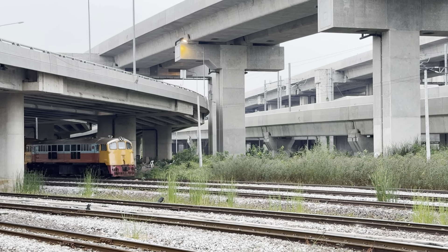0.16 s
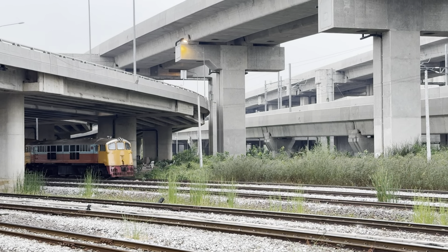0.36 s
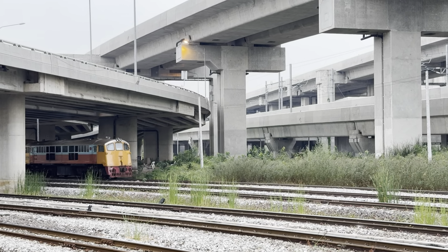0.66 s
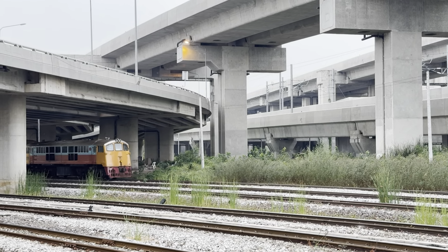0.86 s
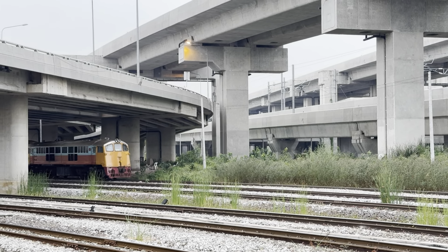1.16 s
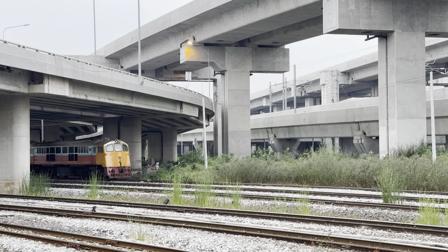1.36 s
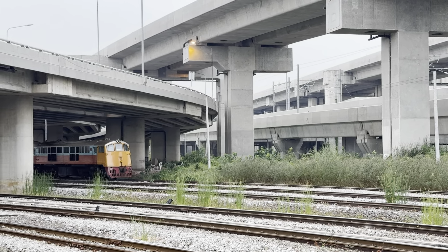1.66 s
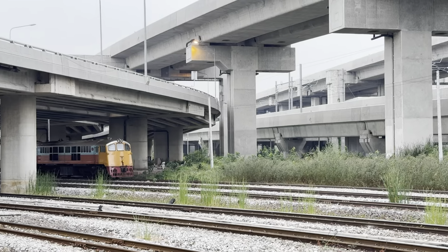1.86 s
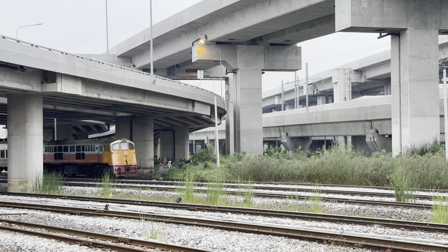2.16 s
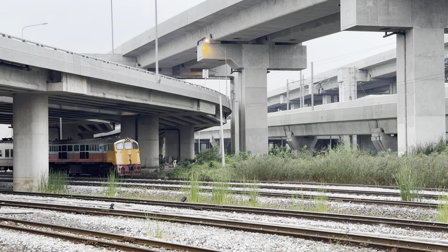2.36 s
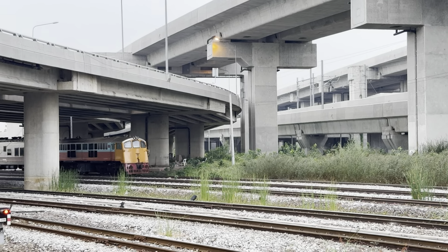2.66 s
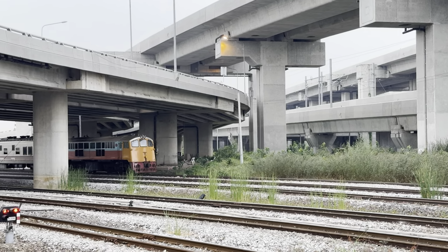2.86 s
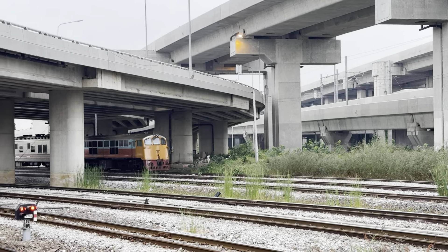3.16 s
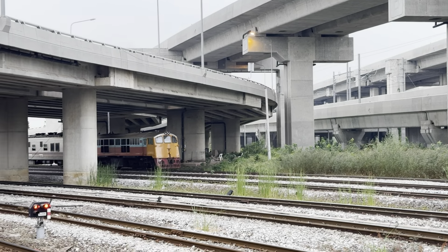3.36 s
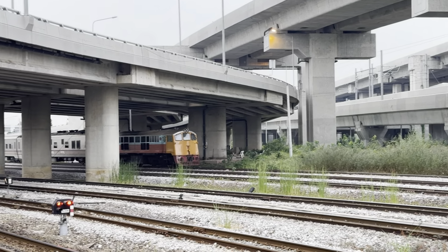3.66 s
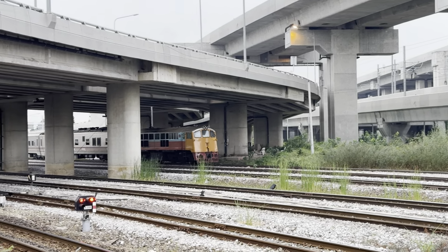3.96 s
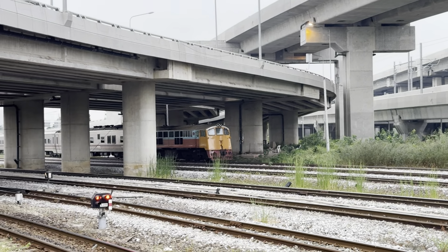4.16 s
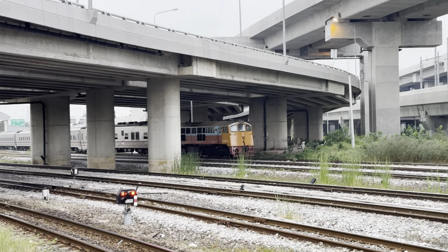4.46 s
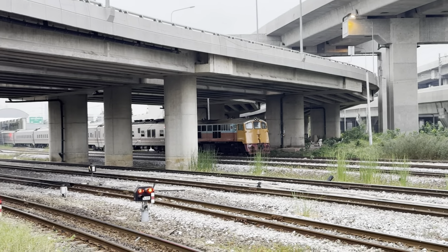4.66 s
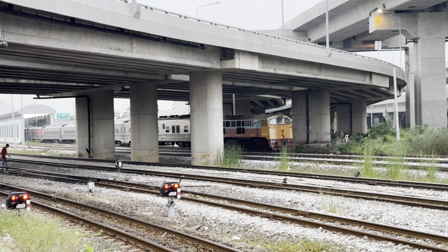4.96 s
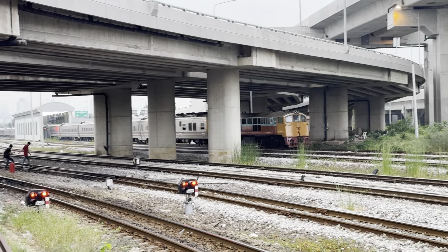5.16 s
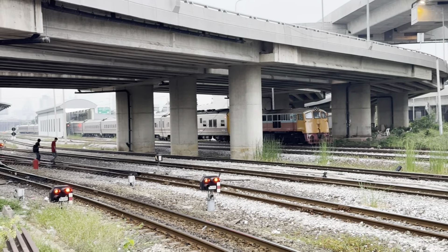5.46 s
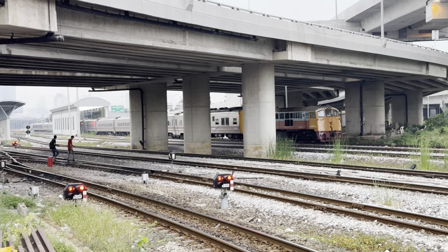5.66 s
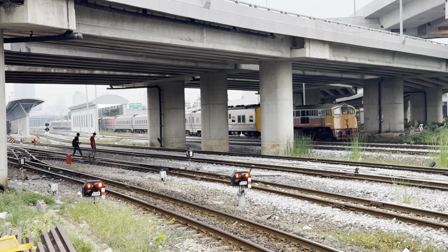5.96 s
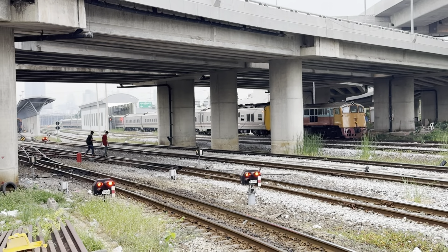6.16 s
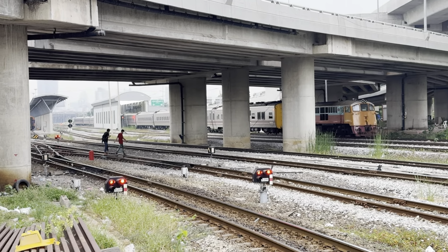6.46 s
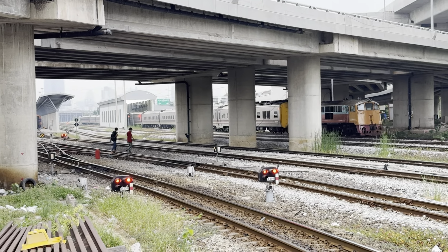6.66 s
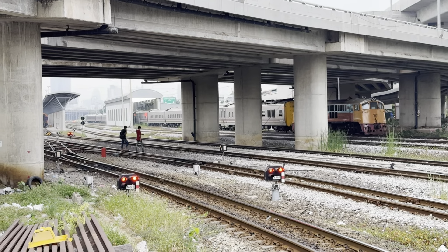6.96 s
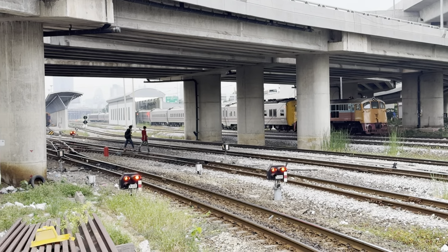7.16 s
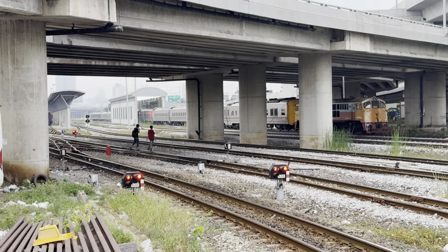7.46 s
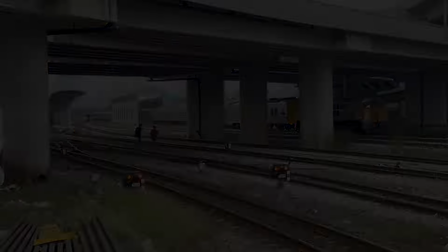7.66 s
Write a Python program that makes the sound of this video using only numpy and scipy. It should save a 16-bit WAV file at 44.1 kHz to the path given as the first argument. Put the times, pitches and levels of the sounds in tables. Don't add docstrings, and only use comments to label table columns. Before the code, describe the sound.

Outdoors in a rail yard beneath concrete flyovers, a diesel locomotive idles along across the tracks with a deep throbbing rumble and broad roar. High wheel squeal flutters in from the start, grows strongest around two seconds, then dies by about three and a half. Afterwards the engine pulses, with quick valve ticks, small brake squeaks and a very faint rising turbo whistle. Stereo microphone at a distance; a brief dropout comes near the end.

```python
import sys
import numpy as np
from scipy import signal
from scipy.fft import rfft, irfft, next_fast_len
from scipy.io import wavfile

SR = 44100
rng = np.random.default_rng(int(sys.argv[2]) if len(sys.argv) > 2 else 0)


def to_wav(sig):
    pcm = np.clip(np.atleast_2d(sig), -1, 1) * 32767
    pcm = np.round(pcm).astype(np.int16)
    wavfile.write(sys.argv[1], SR, pcm.T)


def linear_from_db(decibels):
    return 10 ** (np.asarray(decibels, float) / 20)


N = 343539
PAD = next_fast_len(N)
HZ = np.maximum(np.arange(PAD // 2 + 1) * SR / PAD, 1)

# time in seconds, main squeal level in dB.
PRESSURE = [(0, -54), (.35, -46), (.8, -40.5), (1.2, -48), (1.6, -41), (1.75, -37), (2.71, -37),
            (2.82, -47), (3.6, -67)]
# time in seconds, grip as a share 0-1.
GRIP = [(0, 0.2), (1.72, 0), (1.77, 0.85), (1.98, 0.76), (2.12, 0.66), (2.35, 0.35), (2.6, 0.49),
        (3.3, 0.22)]
# time in seconds, throb level in dB, load level in dB.
STEADY_ENGINE = [(0, -27.5, -24.5), (.6, -33, -27.5), (1.15, -28, -24), (1.3, -38, -33), (1.5, -32, -25.5),
                 (1.7, -31, -33), (2.2, -30, -29), (2.5, -33, -40), (2.7, -27, -36), (3.6, -30, -35),
                 (4.4, -33, -33), (5.2, -49, -37), (7.79, -36, -28.5)]
# time in seconds, throb level in dB, load level in dB.
RISING_ENGINE = [(0, -58, -48), (1.8, -56, -39), (2.199, -32, -30.5), (2.55, -48, -28), (3.5, -28.5, -31),
                 (4.2, -24, -29.5), (5.3, -29, -27), (5.6, -25.5, -32), (6.3, -24.5, -27),
                 (6.55, -32.5, -38), (6.85, -25, -36), (7.25, -44.5, -31), (7.6, -22, -31),
                 (7.79, -28.5, -25)]


def rms_one(x):
    return x / np.sqrt(np.mean(x ** 2) + 1e-20)


def in_time(rows):
    s, *columns = np.transpose(rows)
    return [np.interp(np.arange(N) / SR, s, c) for c in columns]


def at_hz(points, hz):
    table_hz, value = np.array(points).T
    return np.interp(np.log(hz), np.log(table_hz), value)


def drift(rate):
    r = np.exp(-80 * np.pi * rate / SR)
    slow = signal.lfilter([1], [1, -2 * r, r * r], rng.standard_normal(N // 40 + 2002))[2000:]
    slow = rms_one(slow)
    lines = slow[:-1, None] + np.diff(slow)[:, None] * np.arange(40) / 40
    return lines.ravel()[:N]


def tone(hz):
    cycles = np.cumsum(hz + np.zeros(N)) / SR
    return np.sqrt(2) * np.sin(2 * np.pi * (cycles + rng.random()))


def narrow_noise(hz, width_hz, steady=0, count=N):
    turn = 2 * np.pi * np.cumsum(hz + np.zeros(count)) / SR
    a, b = drift(width_hz)[:count], drift(width_hz)[:count]
    ring = a * np.cos(turn) + b * np.sin(turn)
    if steady:
        ring = ring / ((a * a + b * b) / 2 + .01) ** (steady / 2)
    return ring


def patchy_noise(spectrum, patchy_db, count):
    # frequency in Hz, how alike left and right are (0-1).
    likeness = [(60, .998), (150, 0.97), (450, 0.96), (600, 0.75), (1000, 0.58), (1400, 0.9), (1750, 1),
                (2100, 1), (4200, 1), (8000, 0.99), (8900, 1)]
    mid, side = rfft(rng.standard_normal((2, PAD)))
    alike = np.clip(at_hz(likeness, HZ), 0, 1)
    low_hz, high_hz = spectrum[0][0], spectrum[-1][0]
    colour = linear_from_db(at_hz(spectrum, HZ)) * ((HZ > low_hz) & (HZ < high_hz))
    pair = colour * (np.sqrt(1 + alike) * mid + np.sqrt(1 - alike) * side * [[1], [-1]])
    place = (count - 1) * np.log(HZ / low_hz) / np.log(high_hz / low_hz)
    out, together = 0, drift(4.9)
    for k in range(count):
        band = irfft(pair * np.clip(1 - abs(place - k), 0, 1), PAD)[:, :N]
        out = out + band * linear_from_db(patchy_db * (0.25 * together + drift(12)))
    return rms_one(out)


def small_metal():
    # start in seconds, peak level in dB, pitch in Hz.
    valve_ticks = [(2.813, -38, 3740), (2.982, -41, 3740), (3.045, -45, 3730), (3.150, -45, 3770),
                   (3.203, -45, 3730), (3.317, -40.5, 3720), (3.372, -45, 3780), (3.483, -39, 3740),
                   (3.537, -45, 3750), (3.650, -42, 3720), (3.702, -46, 3720), (3.818, -47, 3700),
                   (3.975, -45, 3480), (4.186, -42, 3770), (4.283, -40, 3520), (4.335, -40, 3720),
                   (4.670, -47, 3700), (4.783, -39, 3600), (4.835, -46, 3760), (5.164, -40, 3680),
                   (5.462, -43, 3830), (5.768, -44, 3800), (5.968, -46, 3740), (6.135, -44, 3800),
                   (6.299, -41, 3750), (6.457, -44, 3800), (6.480, -43, 3500), (6.618, -36.5, 3850),
                   (6.728, -41, 3600), (6.779, -35, 3900), (6.940, -36.5, 3800), (7.101, -37, 3840),
                   (7.121, -39, 3540), (7.262, -46, 3750), (7.586, -41, 3750), (7.613, -41, 3520)]
    # start in seconds, peak level in dB, pitch in Hz,
    # time to fall 60 dB in seconds, glide in Hz per second.
    brake_squeaks = [(.19, -43, 5400, .14, 0), (4.12, -48, 4900, .12, 1500), (5.295, -47, 4800, .08, 6000),
                     (5.45, -57, 6480, .5, 0), (5.57, -48, 4880, .12, 0), (5.565, -50, 5300, .12, 0),
                     (5.82, -44, 2580, .4, -1400), (6.43, -51, 5100, .1, 3000), (6.47, -57, 6550, .5, 0),
                     (6.727, -47, 4300, .09, 32000), (6.795, -45, 4150, .09, 16000),
                     (7.22, -57, 6550, .5, 0), (7.18, -49, 4050, .06, 9000), (7.567, -44, 4620, .06, 18000),
                     (7.62, -50, 3900, .14, 6000)]
    tick_t60_s = .026
    events = [(*tick, tick_t60_s, 0) for tick in valve_ticks] + brake_squeaks
    out, t = np.zeros(N), np.arange(int(.3 * SR)) / SR
    for s, peak_db, hz, t60, glide in events:
        start = round(s * SR)
        envelope = linear_from_db(peak_db + 8.5 - 60 * t / t60) * (1 - np.exp(-10 * t / t60))
        ring = envelope * np.sin(2 * np.pi * (hz + glide * t / 2) * t)
        out[start:start + len(t)] += ring[:N - start]
    return out * (.9 + .25 * drift(120))


def turbo():
    # time in seconds, pitch in Hz, level in dB.
    whistle = [(2.9, 6800, -90), (3.4, 6940, -69), (4.5, 7260, -70), (5.8, 7550, -69), (7.79, 7960, -72)]
    hz, level_db = in_time(whistle)
    return linear_from_db(level_db + 1.6 * drift(3)) * narrow_noise(hz, width_hz=29)


def locks(rows):
    attack_s, release_s = 0.02, 0.0081
    t = np.arange(0, N / SR, .001)
    gain = 0
    for s, hold, db in rows:
        gain = gain + linear_from_db(db) * np.interp(t, [s - attack_s, s, s + hold, s + hold + release_s], [0, 1, 1, 0])
    return in_time(np.c_[t, gain])[0]


def flange_rub():
    # time in seconds, rubbing level in dB.
    rub = [(0, -25), (.98, -20), (1.1, 0.5), (1.7, 3), (1.9, 5), (2.3, 4.5), (2.65, 4), (2.9, -12),
           (3.3, -40)]
    rub_hz = [3885, 3940, 4040, 4463, 4916, 5534, 5860, 7171, 7850, 8120, 9410, 12210, 14750]
    # width in Hz, level in dB, extra dB once the grip is hard.
    rub_modes = [(10, -62, 2), (20, -56.5, 0), (26, -53.5, -1), (10, -62, .1), (24, -62, 8), (20, -70, 8),
                 (16, -71, 9), (22, -73, 17), (100, -61, -15), (60, -57, -1.5), (12, -80, 5), (25, -73, .1),
                 (15, -74, -8)]
    # start in seconds, length in seconds, level in dB.
    singing_locks = [
        (1.745, 0.14, -52),
        (1.91, .07, -55),
        (2.02, .1, -66),
        (2.35, .11, -58),
    ]
    singing_hz = 5860
    out, end = np.zeros(N), round(rub[-1][0] * SR)
    rub_db, grip = in_time(rub)[0][:end], in_time(GRIP)[0][:end]
    for hz, (width_hz, level_db, grip_db) in zip(rub_hz, rub_modes):
        gain = linear_from_db(rub_db + level_db + grip * grip_db)
        if hz == singing_hz:
            gain = gain + locks(singing_locks)[:end]
        out[:end] += gain * narrow_noise(hz, width_hz, steady=.3, count=end)
    return out


def squeal_gains():
    # time in seconds, change in dB.
    slips = [(.02, -11), (.09, 4), (.15, 3), (.195, -7), (.23, 0), (.385, 7), (.434, -9), (.55, -7),
             (.585, 13.5), (.69, 7), (.745, -15), (.855, 6), (.945, -1), (1.02, 0), (1.105, -8), (1.125, 4),
             (1.2, -8), (1.235, 6), (1.265, -5), (1.3, 2), (1.39, -16), (1.46, 6), (1.505, -11),
             (1.585, -11), (1.862, -1), (1.92, 7), (2.11, 5.5), (2.305, -17), (2.392, -10), (2.43, 4),
             (2.472, -8), (2.8, -5), (2.92, -8), (2.955, 2), (2.98, -7), (3.01, 1), (3.07, -10), (3.135, 3),
             (3.19, -10), (3.27, -10), (3.32, 8), (3.38, -12)]
    # start in seconds, length in seconds, level in dB.
    second_locks = [(.57, 0.036, -56), (1.2, .03, -50), (1.59, .04, -59), (2.165, 0.036, -54),
                    (2.28, 0.047, -49), (2.39, 0.11, -51), (2.56, 0.14, -60), (2.755, 0.022, -48),
                    (2.82, 0.028, -55), (3.19, .03, -65)]
    # start in seconds, length in seconds, level in dB.
    top_locks = [(.97, 0.11, -60), (1.17, .14, -69), (1.96, .05, -63), (2.09, .12, -57),
                 (2.25, 0.057, -45.5), (2.38, .2, -46), (2.58, .13, -50.5)]
    slip_s, second_db, top_db = 0.02, -56.5, -63
    t, (pressure_db,) = np.arange(0, N / SR, .001), in_time(PRESSURE)
    bumps_db = sum(db * np.exp(-((t - s) / slip_s) ** 2) for s, db in slips)
    slips_db, = in_time(np.c_[t, bumps_db])
    loose_db = .55 * (pressure_db - pressure_db.max())
    main = linear_from_db(pressure_db + slips_db)
    second = linear_from_db(second_db + loose_db) + locks(second_locks)
    top = linear_from_db(top_db + loose_db) + locks(top_locks)
    return [main, second, top]


def wheel_squeal():
    squeal_hz = [4706, 6708, 8549]
    sag_by_mode = [8, 90, 8]
    # time in seconds, strength of the second wheel as a share of the first.
    second_wheel = [(0, .45), (1.15, .5), (1.3, .3), (2.1, .12), (2.8, .15), (3.6, .3)]
    octave_db = -29
    share, = in_time(second_wheel)
    sounding = np.arange(N) <= PRESSURE[-1][0] * SR
    gains = squeal_gains()
    out = 0
    for hz, sag_hz, gain in zip(squeal_hz, sag_by_mode, gains):
        sagged_hz = hz - sag_hz * share
        pair = tone(sagged_hz + 3 * drift(8)) + share * tone(sagged_hz + 23 + 9 * drift(6))
        out = out + gain * linear_from_db(1.3 * drift(30)) * sounding * pair / np.sqrt(1 + share ** 2)
    octave = narrow_noise(2 * squeal_hz[0], width_hz=10)
    return out + linear_from_db(octave_db) * gains[0] * sounding * octave


def wheels():
    squeal = wheel_squeal() + flange_rub()
    lower = signal.sosfiltfilt(signal.butter(6, 5200, fs=SR, output="sos"), squeal)
    grip, = in_time(GRIP)
    early = (0.05 + 0.81 * np.maximum(grip - .2, 0)) * np.gradient(lower) * [[1], [-1]]
    return squeal + early


def chug():
    # time in seconds, turns per second.
    chug_speed = [(0, 31.15), (1.0, 31.15), (1.4, 30.96), (7.79, 30.95)]
    # time in seconds, depth of the chug as a share 0-1.
    chug_depth = [(0, .12), (1.0, .125), (1.5, .105), (2.2, .055), (3, .02), (7.79, .02)]
    start_rad = 2.8
    turns_per_s, depth = in_time(chug_speed)[0], in_time(chug_depth)[0]
    turn = start_rad + 2 * np.pi * np.cumsum(turns_per_s * (1 + .001 * drift(2.7))) / SR
    puffs = .8 * np.cos(turn) + .95 * np.cos(2 * turn) + .55 * np.cos(3 * turn) + .55 * np.cos(4 * turn)
    return [np.exp(np.clip(d, 0, 1) * puffs) for d in (depth, 2.6 * depth)]


def intake_whine(strong):
    # time in seconds, centre pitch in Hz, level in dB.
    whine = [(0, 1689, -42), (.35, 1758, -41), (.75, 1876, -40.5), (1.15, 1894, -41), (1.5, 1970, -38),
             (2.1, 1993, -37), (2.5, 2030, -38.5), (2.9, 1984, -46.5), (3.4, 1904, -50.5), (5.0, 1592, -51),
             (5.8, 1549, -46.5), (6.6, 1503, -47), (7.79, 1439, -49)]
    centre_hz, whine_db = in_time(whine)
    main = linear_from_db(whine_db) * strong * narrow_noise(centre_hz, width_hz=108, steady=.4)
    longer_branch = linear_from_db(whine_db - 9.5) * strong * narrow_noise(.86 * centre_hz, width_hz=120)
    return main + longer_branch


def ringing_panels():
    # pitch in Hz, width in Hz, level in dB.
    panels = [(799.6, 10.5, -49.5), (433.6, 9.1, -51), (3617, 266, -50.5), (2924, 105, -57),
              (12210, 25, -83)]
    return sum(linear_from_db(level_db) * narrow_noise(hz, width_hz) for hz, width_hz, level_db in panels)


def roar(soft):
    # frequency in Hz, level in dB per Hz.
    rumble = [(18, -42), (30, -16), (40, -14.5), (55, -3.5), (75, -6.5), (95, -5.5), (106, -4),
              (140, -10.5), (200, -8), (260, -17)]
    body = [(200, -4), (260, -2), (330, 0), (420, 2), (480, -1), (530, -7.5), (620, -13.5), (720, -14.5)]
    clatter = [(520, -5.5), (650, 1.5), (800, 4.5), (1000, 3.5), (1500, -2), (1800, -5), (2100, -5.5),
               (2900, -5), (3250, -9.5), (3600, -20.5), (4300, -10.5), (5500, -16.5), (7000, -24.5),
               (8500, -27.5)]
    hiss = [(5000, -7), (7000, -1.5), (9500, -2.5), (10200, 2.5), (12000, -10), (13200, -12.5),
            (14500, -17), (15300, -33)]
    # time in seconds, level in dB.
    open_view = [(0, -1), (.7, .5), (1.6, -1), (2.15, 0.6), (2.55, -1.5), (4, -3), (5.7, -4.5), (7.2, -5),
                 (7.79, -5)]
    rumble_db, body_db, clatter_db, hiss_db = -23, -30.5, -35.5, -51.5
    dip_s, dip_width_s, dip_db = 2.53, .065, -13
    view_db, = in_time(open_view)
    load_db = np.maximum(in_time(STEADY_ENGINE)[1], in_time(RISING_ENGINE)[1])
    hiss_dip_db = dip_db * np.exp(-((np.arange(N) / SR - dip_s) / dip_width_s) ** 2)
    out = linear_from_db(rumble_db + 0.33 * load_db) * patchy_noise(rumble, patchy_db=-1.5, count=3)
    out += linear_from_db(body_db + view_db) * soft * patchy_noise(body, patchy_db=0.64, count=3)
    out += linear_from_db(clatter_db + 0.94 * view_db) * soft * patchy_noise(clatter, patchy_db=1.0, count=9)
    out += linear_from_db(hiss_db + 1.72 * view_db + hiss_dip_db) * soft * patchy_noise(hiss, patchy_db=1.5, count=3)
    return out


def exhaust():
    # multiple of the cycle rate, level in dB against the load.
    orders = [(7, -18.5), (9, -15), (10, -16.5), (11, -13.5), (11.5, -12.5), (12, -5), (12.5, -12.5),
              (13, -6), (14, -14.5), (21, -16)]
    # time in seconds, cycles per second.
    steady_speed = [(0, 6.05), (.6, 6.06), (1.15, 6.12), (2.2, 6.12), (2.7, 6.19), (3.6, 6.17),
                    (7.79, 6.19)]
    rising_speed = [(0, 5.1), (1.8, 5.12), (2.55, 5.67), (3.0, 5.88), (3.5, 5.98), (4.2, 6.02), (5, 6.07),
                    (6.2, 6.1), (7.79, 6.16)]
    # time in seconds, pitch in Hz, level in dB.
    second_engine = [(0, 60.95, -30), (1.3, 63, -35), (1.7, 63.2, -53), (2.4, 62.7, -46), (3.2, 63.56, -43),
                     (4, 62.55, -52), (7.79, 63, -40)]
    generator = [(0, 151.5, -41), (.6, 151.7, -42), (1.2, 151.9, -47.5), (3.5, 151.9, -49.5),
                 (3.9, 151.7, -40.5), (4.55, 153.1, -45.5), (5.5, 152, -34.5), (6.2, 151.8, -48.5),
                 (7.1, 152, -42), (7.79, 152, -58)]
    throb_order, in_step_s = 15, 3.83
    out = 0
    for speed, levels, wobble_db in ((steady_speed, STEADY_ENGINE, 3.0), (rising_speed, RISING_ENGINE, 1.2)):
        (cycle_hz,), (throb_db, load_db) = in_time(speed), in_time(levels)
        cycles = np.cumsum(cycle_hz) / SR
        throb = np.sqrt(2) * np.cos(2 * np.pi * throb_order * (cycles - cycles[round(in_step_s * SR)]))
        out = out + linear_from_db(throb_db + wobble_db * drift(4.0)) * throb
        coarse = 0
        for order, level_db in orders:
            gain = linear_from_db(load_db[::4] + level_db + 3.3 * drift(0.65)[::4])
            coarse = coarse + gain * np.sin(2 * np.pi * (order * cycles[::4] + rng.random()))
        out = out + np.sqrt(2) * np.interp(np.arange(N) / 4, np.arange(len(coarse)), coarse)
    for rows in (second_engine, generator):
        hz, level_db = in_time(rows)
        out = out + linear_from_db(level_db + 0.72 * drift(3.8)) * tone(hz)
    return out


def scene():
    soft, strong = chug()
    engines = roar(soft) + ringing_panels() + intake_whine(strong) + exhaust()
    return engines + wheels() + turbo() + small_metal()


def low_pass(x):
    return signal.sosfilt(signal.butter(12, 15140, fs=SR, output="sos"), x)


def record(dry):
    # frequency in Hz, left level over right in dB.
    left_over_right = [(60, -.5), (450, -0.4), (800, -2), (1000, -1), (1350, 2.5), (1800, 0.5), (9000, 1)]
    # frequency in Hz, how far the left leads in radians.
    left_lead = [(60, 0), (300, -.15), (450, -.3), (1100, -.8), (1600, 0), (8100, 0), (8450, 1.2),
                 (8850, 2.1), (9020, np.pi), (9600, np.pi), (10600, 4.5), (11600, 2 * np.pi),
                 (12800, 2 * np.pi), (13300, 7.6), (13800, 3 * np.pi)]
    dropout = (7.7285, 7.7741)
    half = linear_from_db(at_hz(left_over_right, HZ) / 2) * np.exp(.5j * at_hz(left_lead, HZ))
    ports = irfft(rfft(dry, PAD) * [half, 1 / half], PAD)[:, :N]
    t = np.arange(N) / SR
    fade_out = np.clip((dropout[0] - t) / .003, 0, 1)
    ports = ports * np.maximum(fade_out, t > dropout[1])
    since = np.maximum(t - dropout[1], 0)
    jump = .07 * (since > 0) * np.exp(-since / .003)
    return low_pass(ports + jump)


dry = scene()
out = record(dry)
to_wav(out)
```